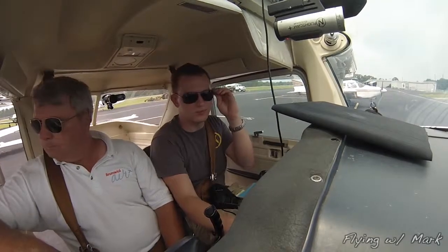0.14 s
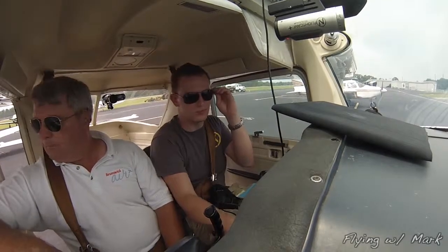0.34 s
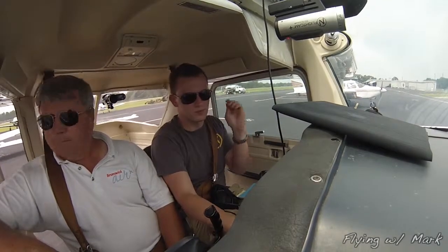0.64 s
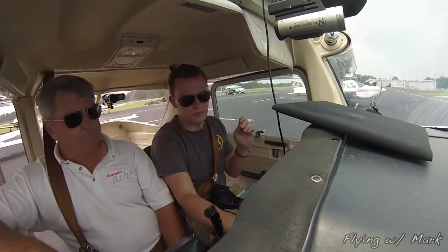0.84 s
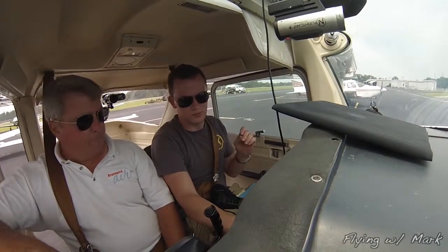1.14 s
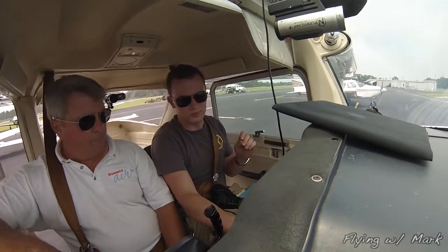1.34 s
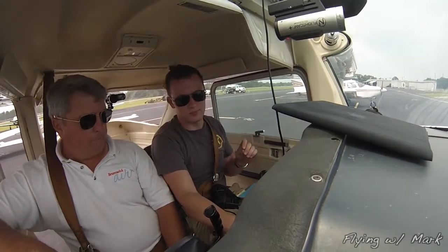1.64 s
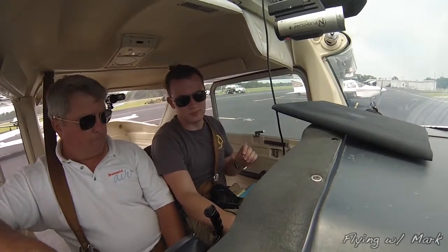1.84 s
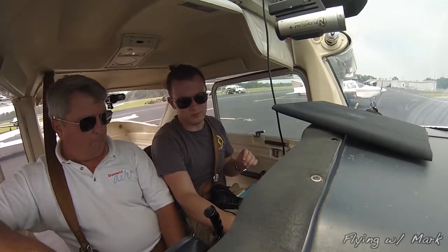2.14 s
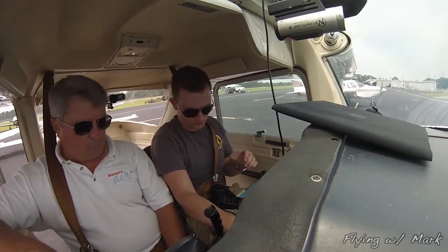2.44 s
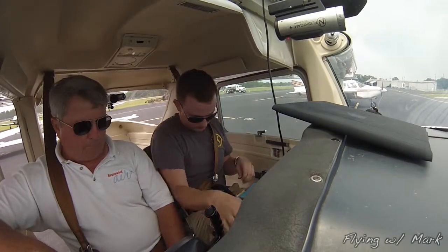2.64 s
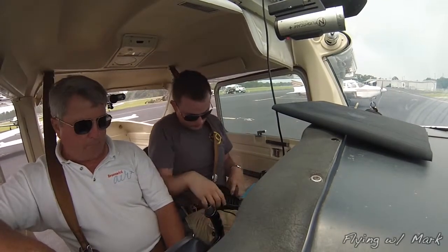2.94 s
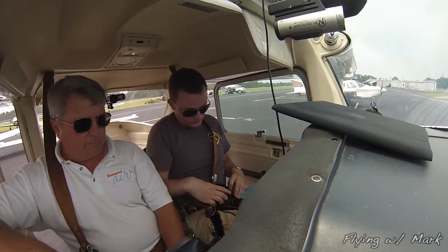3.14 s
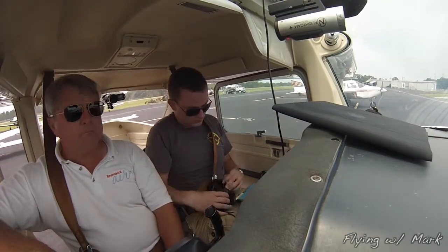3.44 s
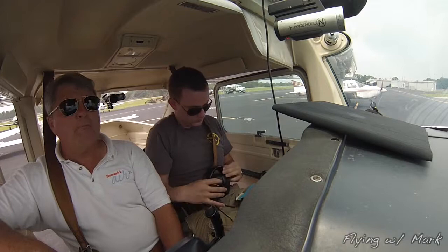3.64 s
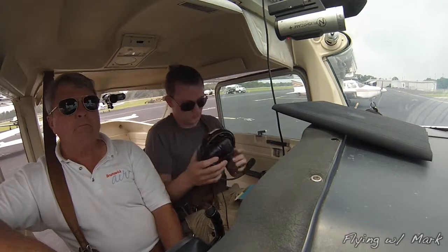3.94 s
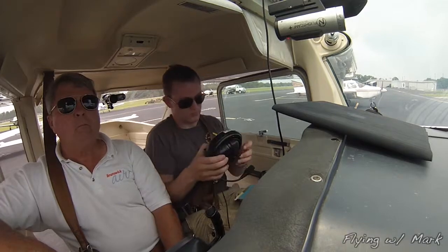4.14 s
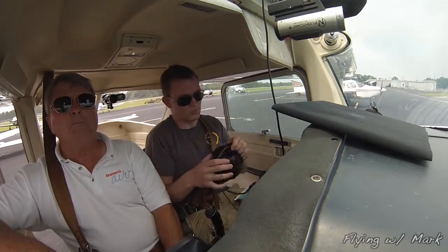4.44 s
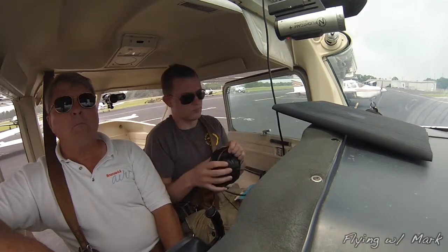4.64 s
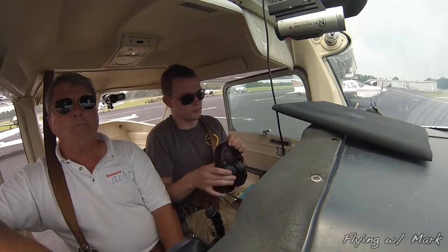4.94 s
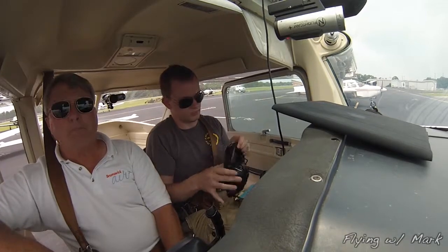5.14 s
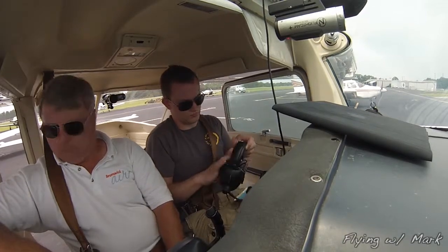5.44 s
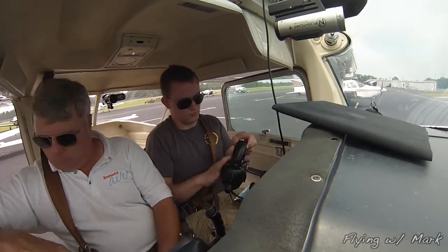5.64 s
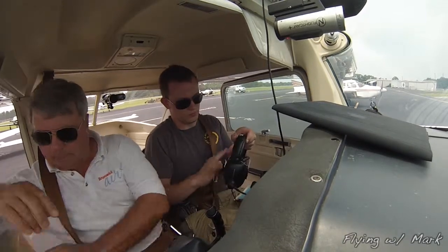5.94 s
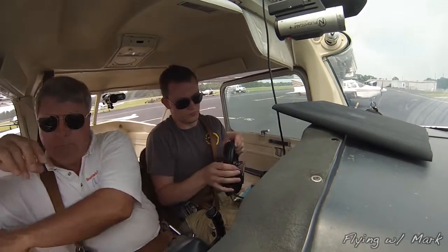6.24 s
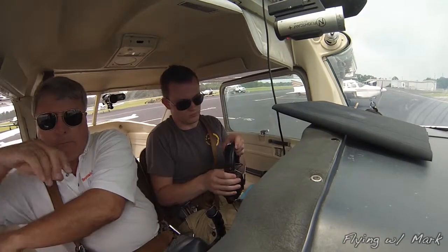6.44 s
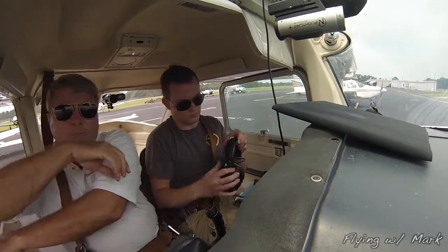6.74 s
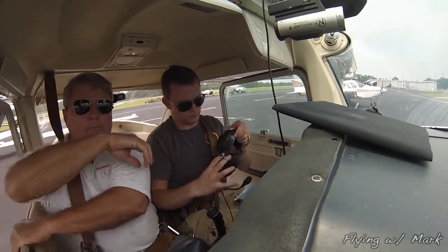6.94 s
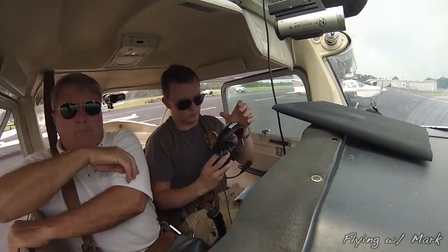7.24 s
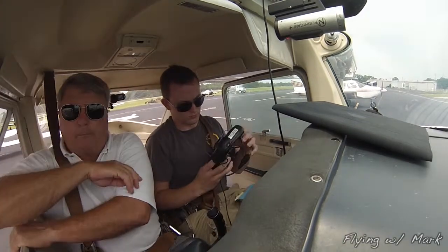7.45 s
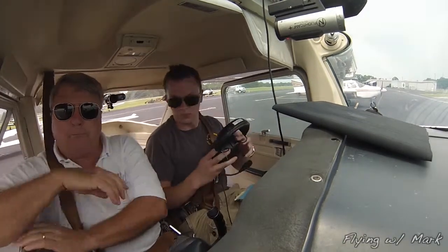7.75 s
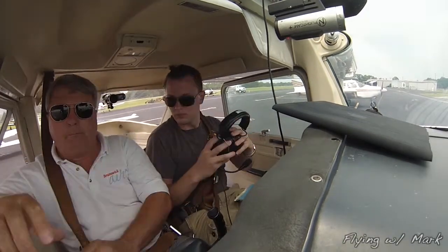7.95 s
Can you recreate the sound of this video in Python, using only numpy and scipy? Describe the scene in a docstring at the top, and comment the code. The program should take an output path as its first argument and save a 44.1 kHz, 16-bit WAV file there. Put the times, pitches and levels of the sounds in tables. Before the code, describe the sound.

A small propeller plane idles with a booming, throbbing drone, heard from within the cockpit. A short rise of throttle brings more hiss and ticking rattles from the panels before the engine settles lower and runs evenly. A thin alternator whine swells and fades in the background, occasional low puffs of wind hit the microphone, and one short knock sounds toward the end.

```python
"""Propeller engine idling, heard in the cabin

A four-cylinder piston engine with a two-blade propeller settles to idle after a short rise of throttle.
Low orders of its cycle boom in the small cabin; each firing puffs exhaust roar and shakes the panels
and loose trim, over a rumble and a pulsing hiss. The alternator whines harder while a flashing lamp
draws current, gusts buffet the microphone, and a hand knocks once on the trim."""
import sys
import numpy as np
from scipy import signal
from scipy.io import wavfile
from scipy.ndimage import uniform_filter1d

SR = 44100
rng = np.random.default_rng(int(sys.argv[2]) if len(sys.argv) > 2 else 0)


def master_out(mix):
    """Clip the mix to full scale and print it as 16-bit PCM to the path in sys.argv[1]."""
    frames = np.transpose(np.atleast_2d(mix))
    ceiling = np.clip(frames, -1, 1)
    pcm = np.round(ceiling * 32767).astype(np.int16)
    wavfile.write(sys.argv[1], SR, pcm)


N = 356769

# Exhaust roar and the panels it drives: (time [s], roar level [dB], panel level [dB])
ROAR_AND_PANEL_LEVELS = [(0, -34.5, -52), (.55, -34, -40), (1.7, -34.5, -42), (2.3, -39, -44),
                         (2.8, -40.5, -47), (3.5, -34.5, -39.5), (4.2, -35, -39.5), (5.5, -35, -42),
                         (6.4, -35, -40.5), (8.09, -32.5, -38)]


def from_db(db):
    """Amplitude ratio of a level in decibels."""
    return 10 ** (np.asarray(db) / 20)


def unit_rms(x):
    """Normalisation to unit mean power."""
    return x / np.sqrt(np.mean(x ** 2) + 1e-20)


def in_time(rows):
    """Linear interpolation of each column at every sample."""
    times, *columns = np.transpose(rows)
    return [np.interp(np.arange(N) / SR, times, column) for column in columns]


def at_hz(points, hz):
    """Interpolation on a logarithmic frequency axis."""
    frequencies, values = np.transpose(points)
    return np.interp(np.log(hz), np.log(frequencies), values)


def drift(corner_hz):
    """Slow random fluctuation of unit rms: low-passed noise, drawn at every 40th sample."""
    pole = np.exp(-2 * np.pi * corner_hz * 40 / SR)
    slow = signal.lfilter([1], [1, -2 * pole, pole * pole], rng.standard_normal(N // 40 + 2002))[2000:]
    return np.interp(np.arange(N) / 40, np.arange(len(slow)), unit_rms(slow))


def resonator(force, hz, t60):
    """Damped oscillator: a unit impulse starts a unit sine that falls 60 dB in t60 seconds."""
    r, w = from_db(-60 / (t60 * SR)), 2 * np.pi * hz / SR
    return signal.lfilter([0, np.sin(w)], [1, -2 * r * np.cos(w), r * r], force + 1e-18)


def stereo_pair(mid, side, correlation):
    """Partial coherence: the weighted sum and difference of two noises form left and right."""
    correlation = np.clip(correlation, -1, 1)
    return np.sqrt(1 + correlation) * mid + np.sqrt(1 - correlation) * side * [[1], [-1]]


def banded_noise(spectrum, flicker_db, per_octave):
    """Incoherent sum of noise bands, each with its own level, flicker and coherence; unit rms."""
    # Likeness of left and right: (frequency [Hz], correlation [-1 to 1])
    coherence = [(60, 0.89), (250, 0.97), (400, 0.7), (700, 0.95), (1100, 1), (1700, 0.36), (3000, 0.5),
                 (5000, 0.071), (15000, 0.086)]
    # Balance of the noise: (frequency [Hz], left minus right [dB])
    balance = [(60, 7), (250, 2), (500, 0), (1000, -.5), (2000, 0.4), (8000, .5)]
    bottom_hz, top_hz = spectrum[0][0], spectrum[-1][0]
    edges = 2 ** np.arange(np.log2(bottom_hz), np.log2(top_hz), 1 / per_octave)
    out, white = 0, rng.standard_normal((2, 2, N))  # adjacent bands get independent noise
    for k, (low, high) in enumerate(zip(edges, np.append(edges[1:], top_hz))):
        band = signal.butter(2, [low, high], "band", fs=SR, output="sos")
        mid, side = signal.sosfilt(band, white[k % 2])
        hz = np.sqrt(low * high)
        gain = from_db(at_hz(spectrum, hz) + flicker_db * drift(12))
        pan = from_db(at_hz(balance, hz) / 2 * np.array([[1], [-1]]))
        out += gain * pan * stereo_pair(mid, side, at_hz(coherence, hz))
    return unit_rms(out)


def firing_pulses(firings, start, rise, uneven_db, depth_db=5):
    """Amplitude modulation of unit rms: one uneven swell per firing; start and rise in periods."""
    periods = firings - start
    share = periods % 1
    swell = np.sin(np.pi / 2 * np.minimum(share / rise, (1 - share) / (1 - rise))) ** 2
    strength = rng.standard_normal(int(firings[-1]) + 4)[np.floor(periods).astype(int) + 2]
    return unit_rms(from_db(swell * (depth_db + uneven_db * strength)))


def add_burst(out, time_s, peak_db, decay_s, hz, spread, rise_s):
    """Adds a transient: exponentially decaying stereo noise from hz / spread to hz * spread."""
    start = round(time_s * SR)
    age = np.arange(round(6 * decay_s * SR)) / SR
    noise = rng.standard_normal((2, len(age))) * np.exp(-age / decay_s) * (1 - np.exp(-age / rise_s))
    band = signal.butter(1, [hz / spread, hz * spread], "band", fs=SR, output="sos")
    noise = signal.sosfilt(band, noise)
    out[:, start:start + len(age)] += (from_db(peak_db) * noise / np.abs(noise).max())[:, :N - start]


def alternator_whine(cycles, throttle):
    """Electrical ripple follows the crank and grows with the lamp's load, less so at open throttle."""
    # Ripple harmonics, lowest first: (lamp-on level [dB], lamp-off level [dB], full-throttle gain [dB])
    harmonics = [(-49, -55, 5.5), (-55, -57.5, 0), (-57, -61.5, 0), (-61, -64.5, 0), (-64.5, -68, 0),
                 (-67, -70, 0)]
    ripples_per_cycle = 249.3
    first_flash_s, period_s, lit_s = .825, 1.372, .7
    since_on = (np.arange(N) / SR - first_flash_s) % period_s
    lit = uniform_filter1d((since_on < lit_s) * 1., size=900)
    inrush_db = uniform_filter1d(2.5 * np.exp(-since_on / .08), size=900)  # a cold filament draws more
    unloading = (1 - lit) * (1 - .26 * throttle)
    phase = 2 * np.pi * ripples_per_cycle * cycles + .55 * drift(30)  # belt and crank twist blur the pitch
    out = 0
    for k, (on_db, off_db, open_db) in enumerate(harmonics, 1):
        level_db = on_db + inrush_db - (on_db - off_db) * unloading + open_db * throttle + 2 * drift(37)
        out += np.sqrt(2) * from_db(level_db) * np.sin(k * phase)
    return out


def wind_buffets():
    """Turbulent pressure at the microphone ports: runs of low puffs, incoherent left and right."""
    # Gusts: (time [s], duration [s], level [dB])
    gusts = [(.3, .17, -19), (0.598, .23, -19), (1.25, 0.23, -22), (1.722, 0.28, -18.5), (2.551, .1, -24),
             (3.552, 0.07, -24), (4.13, 0.1, -22), (4.851, .17, -19.5), (7.3, .34, -16), (7.704, 0.2, -26),
             (8.0, .08, -16)]
    puffs_per_s = 28
    out = np.zeros((2, N))
    for start_s, length_s, level_db in gusts:
        count = max(round(length_s * puffs_per_s), 1)
        for k, (late, weak, long) in enumerate(rng.random((count, 3))):
            time_s = start_s + length_s * (k + .6 * late) / count
            add_burst(out, time_s, level_db - 5.5 * weak, .013 * (.6 + long), 110, 1.4, rise_s=.0079)
    return signal.sosfilt(signal.butter(2, 420, fs=SR, output="sos"), out)


def hiss(firings, throttle):
    """Treble noise, modulated at the firing rate; its level follows the throttle and partly the roar."""
    # Hiss spectrum: (frequency [Hz], relative spectral density [dB])
    spectrum = [(1000, -19), (1700, -5), (2040, -19.5), (2200, -2), (2410, -2), (4470, -4), (7080, -10.5),
                (8830, -10), (13400, -17), (15400, -10)]
    roar_db, _ = in_time(ROAR_AND_PANEL_LEVELS)
    level_db = -40.5 + 7.5 * throttle + .37 * (roar_db - roar_db.mean())
    noise = from_db(level_db) * banded_noise(spectrum, flicker_db=1.47, per_octave=2)
    return noise * firing_pulses(firings, start=.73, rise=.21, uneven_db=1.7)


def trim_shakes(cycles, throttle):
    """Impacts on the trim: hard shakes, lesser random ones and the roughest cylinder's kick each cycle."""
    # Hardest shakes: (time [s], relative level [dB], pitch [Hz])
    hard = np.array([(0.0587, -24.5, 4800), (0.349, -25, 4420), (0.3743, -23, 3400), (0.4536, -22, 4730),
                     (0.4783, -20.5, 5180), (0.5036, -23, 4430), (0.6855, -18, 3670), (0.7587, -26, 4800),
                     (0.7857, -21, 2950), (1.1643, -26, 4510), (1.1882, -25.5, 3980), (1.39, -22, 2960),
                     (1.49, -22, 3000), (1.7968, -22.5, 3410), (7.0436, -19, 3020), (7.8935, -29, 4000)])
    chances_per_s = 6
    when, chance, weak, tone = rng.random((round(chances_per_s * N / SR), 4)).T
    when = when * (N - 1) / SR
    occurs = chance < throttle[(when * SR).astype(int)] ** 2
    lesser = np.transpose([when, -31 - 8 * weak, 2900 * 1.7 ** tone])[occurs]
    kick_at = np.flatnonzero(np.diff(np.floor(cycles - .6)))
    kick_db = -27 - 20 * (1 - throttle[kick_at]) - 6 * rng.random(len(kick_at))
    kicks = np.transpose([kick_at / SR, kick_db, np.full(len(kick_at), 3000)])
    apart = np.abs(kicks[:, :1] - hard[:, 0]).min(axis=1) > .015  # a hard shake replaces its kick
    return np.vstack([hard, lesser, kicks[apart]]).T


def trim_rattle(firings, throttle):
    """Modal ringing of loose metal: shakes excite modes near their pitch, and every firing taps lightly."""
    # Modes of the trim: (frequency [Hz], gain [dB], 60 dB decay time [s])
    modes = [(2997, -1, 0.038), (3390, -6, 0.025), (3845, -10, 0.041), (4100, -1, 0.027), (4434, 1, 0.027),
             (4725, -2.5, 0.071), (5210, -5.5, 0.054), (6050, -6.5, .02), (6410, -4, 0.021)]
    times, shake_db, pitch_hz = trim_shakes(firings / 4, throttle)
    shake_at = np.round(times * SR).astype(int)
    tap_at = np.flatnonzero(np.diff(np.floor(firings - .6)))
    fade = np.exp(-1 / (.0043 * SR))  # a shake is a few ms of tiny contacts
    out, grit = np.zeros((2, N)), rng.standard_normal((2, N))
    for hz, gain_db, t60 in modes:
        impulses = np.full(N, 1e-18)
        octaves_off = np.abs(np.log2(hz / pitch_hz))
        impulses[shake_at] = from_db(shake_db - 22 - 25 * octaves_off)
        impulses[tap_at] += from_db(-66 + 11 * throttle[tap_at] + 2.5 * rng.standard_normal(len(tap_at)))
        force = signal.lfilter([1], [1, -fade], impulses) * grit
        out += from_db(gain_db) * resonator(force, hz, t60)
    for time_s, level_db in zip(times, shake_db):
        add_burst(out, time_s, level_db - 1.5, decay_s=.008, hz=6000, spread=1.65, rise_s=.0034)
    return out


def hand_knock():
    """Impulse response of the trim: each contact rings damped modes, with a crunch and a bright crack."""
    # The knock and its bounces: (time [s], level [dB])
    contacts = [(7.040, -9.5), (7.0455, -3.5), (7.052, -4.5), (7.060, -15), (7.066, -6.5), (7.072, -16)]
    # Struck modes: (frequency [Hz], gain [dB], 60 dB decay time [s])
    modes = [(89, 2.5, 0.099), (256.6, -6, 0.16), (382, -8.5, 0.054), (610, -13, .06), (914, -18, 0.045),
             (2850, -11, 0.024)]
    out, impulses = np.zeros((2, N)), np.zeros(N)
    for time_s, level_db in contacts:
        impulses[round(time_s * SR)] = from_db(level_db)
        add_burst(out, time_s, level_db - 5, decay_s=.011, hz=400, spread=1.8, rise_s=.0015)
        add_burst(out, time_s, level_db - 12, decay_s=.004, hz=3500, spread=1.1, rise_s=.0005)
    return out + sum(from_db(gain_db) * resonator(impulses, hz, t60) for hz, gain_db, t60 in modes)


def panel_resonances(firings):
    """Forced vibration: noise keeps narrow resonances ringing, and they swell with each firing."""
    # Panel modes: (frequency [Hz], bandwidth [Hz], relative level [dB], correlation [clipped to -1..1])
    modes = [(244.6, 44, -1.5, 1), (631, 90, -3, 1), (811.6, 18, -4.5, 0.79), (946, 19, -7, -1.1),
             (3852, 57, -10.5, 0.11)]
    _, panel_db = in_time(ROAR_AND_PANEL_LEVELS)
    out = 0
    for hz, width_hz, level_db, correlation in modes:
        mid, side = resonator(rng.standard_normal((2, N)), hz, t60=np.log(1000) / np.pi / width_hz)
        out += from_db(level_db) * unit_rms(stereo_pair(mid, side, correlation))
    return from_db(panel_db) * out * firing_pulses(firings, start=.28, rise=.48, uneven_db=3.5)


def rumble(throttle):
    """Low-frequency random noise whose level rises with the throttle."""
    # Rumble spectrum: (frequency [Hz], relative spectral density [dB])
    spectrum = [(12, 11.5), (25, 4.5), (50, -3.5), (90, -7.5), (140, -33), (260, -20.5), (400, -64)]
    return from_db(-24 + 8.1 * throttle) * banded_noise(spectrum, flicker_db=0, per_octave=2)


def exhaust_roar(firings):
    """Pulsating flow: each firing releases a puff of broadband exhaust noise."""
    # Exhaust spectrum: (frequency [Hz], relative spectral density [dB])
    spectrum = [(88, -42), (150, -3), (168, -4), (200, 3.5), (247, -1), (371, -8.5), (651, -5), (897, -7.5),
                (1340, -4), (1840, -17.5), (2100, -12), (2730, -44), (4620, -120)]
    roar_db, _ = in_time(ROAR_AND_PANEL_LEVELS)
    noise = from_db(roar_db) * banded_noise(spectrum, flicker_db=1.3, per_octave=3)
    return noise * firing_pulses(firings, start=.29, rise=.49, uneven_db=1)


def engine_boom(cycles, throttle):
    """Harmonics of the engine cycle; the firing and blade rate (order 4) and two overtones waver least."""
    # Cabin boom: (order [per cycle], closed-throttle level [dB], full-throttle level [dB])
    orders = [(2, -74, -21), (3, -60, -27), (4, -19.5, -12.5), (5, -70, -28), (6, -60, -68),
              (7, -39.5, -15), (8, -6.5, -7), (10, -34, -39.5), (12, -34.5, -25), (16, -42, -40.5),
              (20, -53, -53), (24, -50.5, -43.5)]
    out = np.zeros(N)
    for order, closed_db, open_db in orders:
        waver_db, slip_rad = (.5, .06) if order in (4, 8, 12) else (2, .35)
        level_db = closed_db + (open_db - closed_db) * throttle + waver_db * (1 + throttle) * drift(5.1)
        out -= from_db(level_db) * np.sin(2 * np.pi * order * cycles + slip_rad * drift(2.6))
    return out * from_db([[1.1], [-1.1]])  # louder on the left


def scene():
    """Superposition at two microphone ports; the whine leaks equally into both channels."""
    # Engine speed: (time [s], crank speed [rpm])
    crank_speed = [(0, 1112), (.4, 1154), (.8, 1191), (1.1, 1189), (1.35, 1198), (1.6, 1181), (2.2, 1077),
                   (2.5, 1060), (3.05, 1065), (3.6, 1070), (4.1, 1051), (4.5, 1045), (4.95, 1051),
                   (5.45, 1038), (6.1, 1056), (6.95, 1057), (7.8, 1047), (8.09, 1055)]
    # Throttle setting: (time [s], opening [0-1])
    throttle_opening = [(0, 0.4), (.5, 0.87), (1.5, 0.87), (2.05, 0.56), (2.4, 0.25), (7.0, 0.17),
                        (8.09, 0.15)]
    rpm, throttle = in_time(crank_speed)[0], in_time(throttle_opening)[0]
    cycles = np.cumsum(rpm / 120) / SR + .05  # a four-stroke cycle is two turns
    firings = 4 * cycles
    engine = engine_boom(cycles, throttle) + rumble(throttle) + exhaust_roar(firings)
    cabin = hiss(firings, throttle) + panel_resonances(firings) + trim_rattle(firings, throttle)
    left, right = engine + cabin + hand_knock() + wind_buffets()
    left = np.pad(left, (6, 0), "edge")[:N]  # sound reaches the left port 6 samples later
    return np.array([left, right]) + alternator_whine(cycles, throttle)


def record(dry):
    """Saturation and limiting: overload clips and turns the gain down; a low-pass cuts the top."""
    attack_s, release_db_per_s, stopband_hz = .01, 110, 15900
    over_db = np.maximum(20 * np.log10(np.abs(dry).max(axis=0) + 1e-9), 0)
    fall_db = release_db_per_s * np.arange(N) / SR
    held_db = np.maximum.accumulate(over_db + fall_db) - fall_db
    pole = np.exp(-1 / (attack_s * SR))
    gain = from_db(-.8 * signal.lfilter([1 - pole], [1, -pole], held_db))
    padded = np.pad(gain * np.clip(dry, -1, 1), ((0, 0), (500, 0)), "edge")  # lets the filter settle
    return signal.sosfilt(signal.cheby2(16, 75, stopband_hz, fs=SR, output="sos"), padded)[:, 500:]


dry = scene()
out = record(dry)
master_out(out)
```